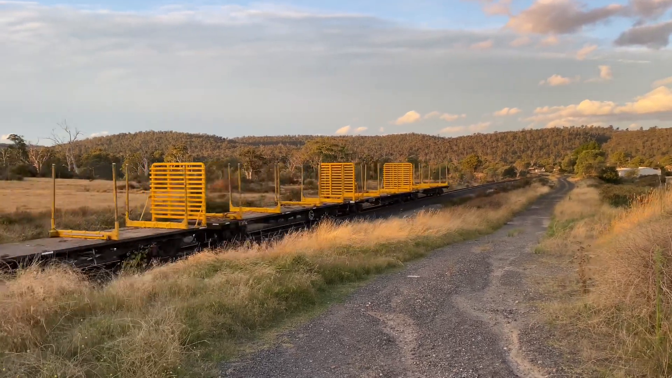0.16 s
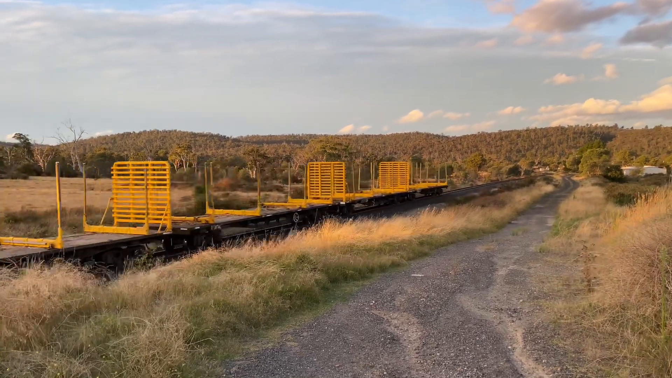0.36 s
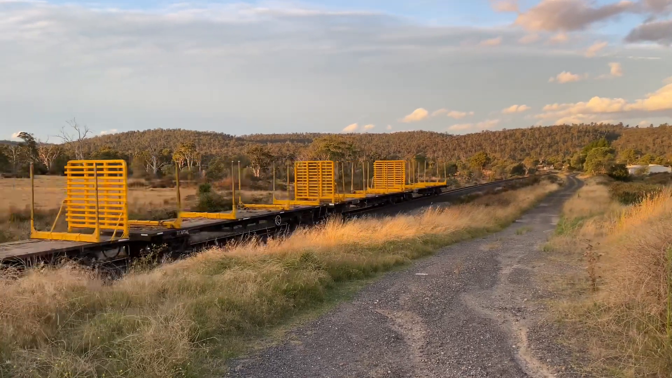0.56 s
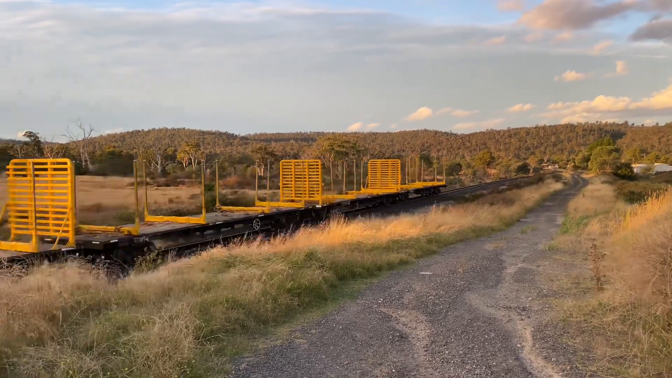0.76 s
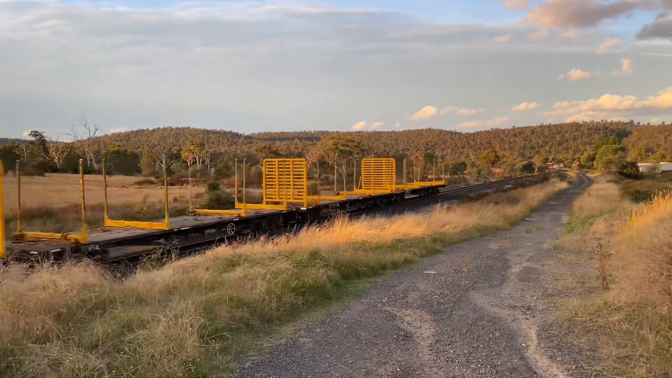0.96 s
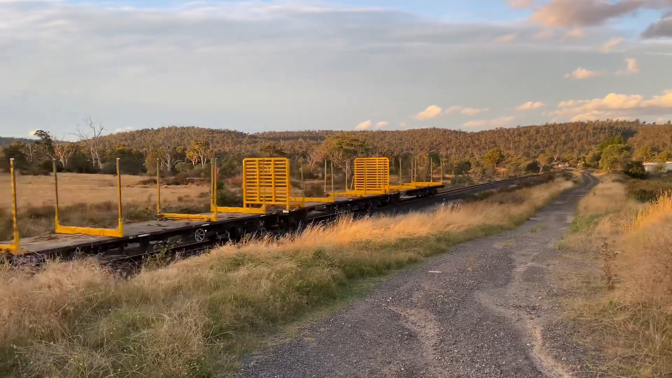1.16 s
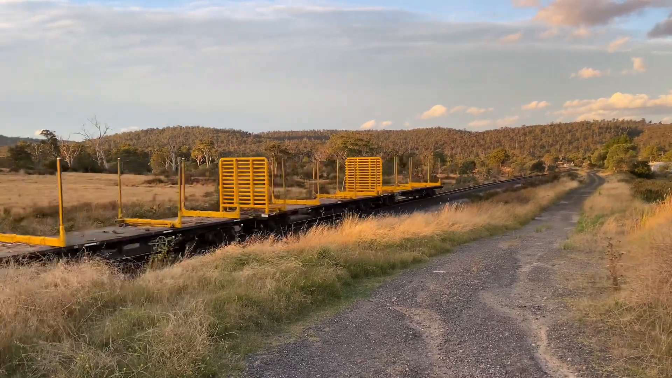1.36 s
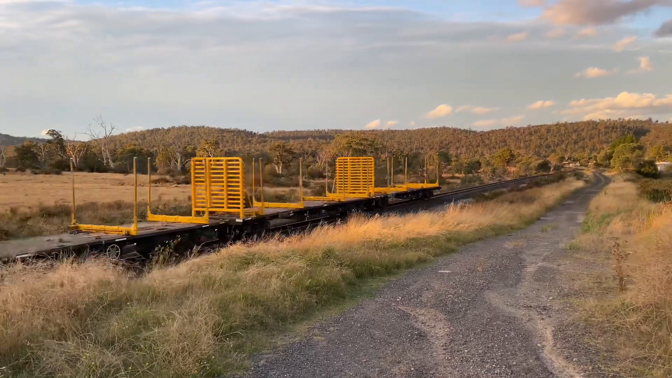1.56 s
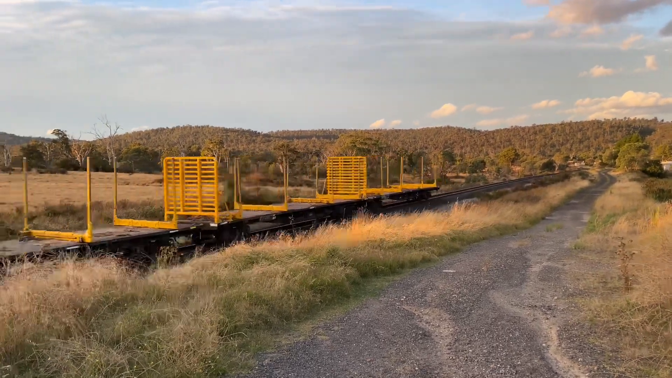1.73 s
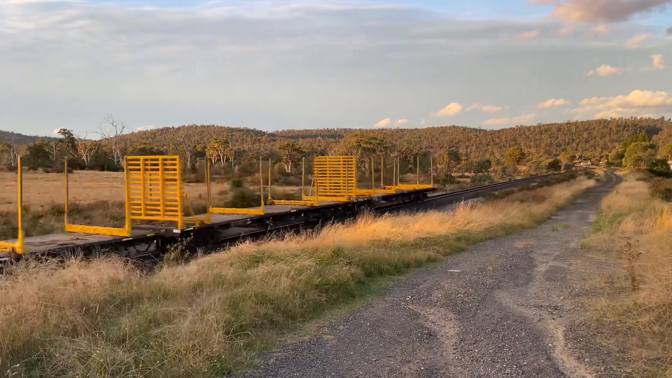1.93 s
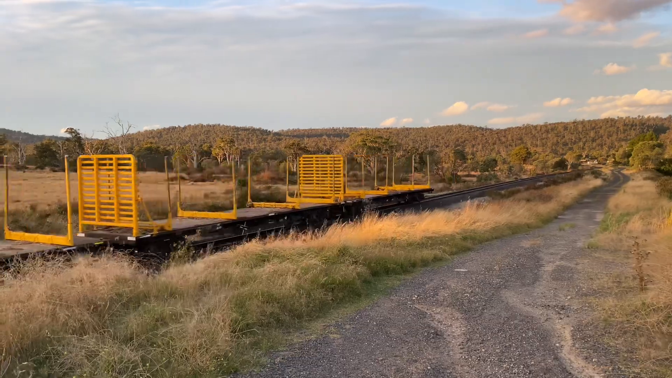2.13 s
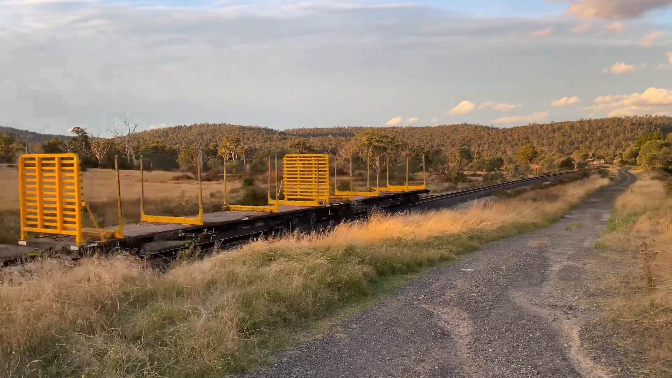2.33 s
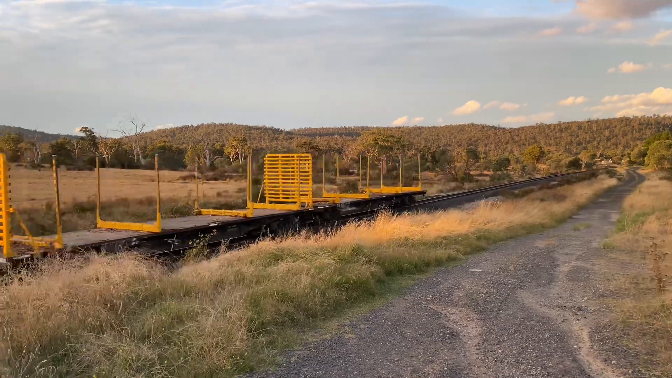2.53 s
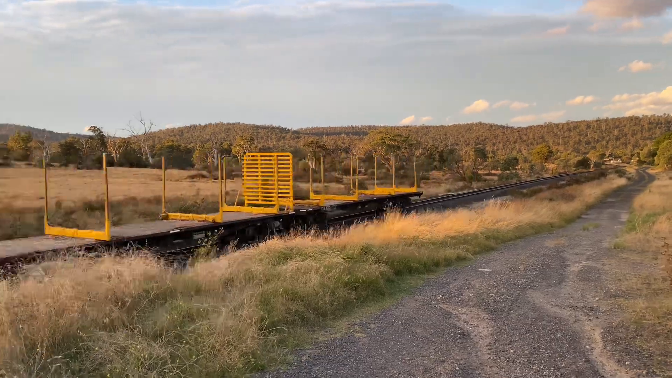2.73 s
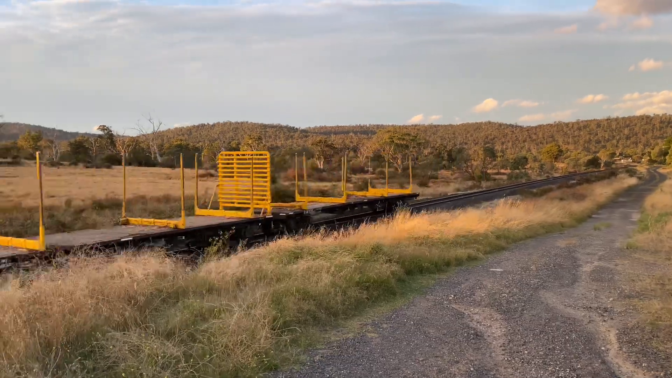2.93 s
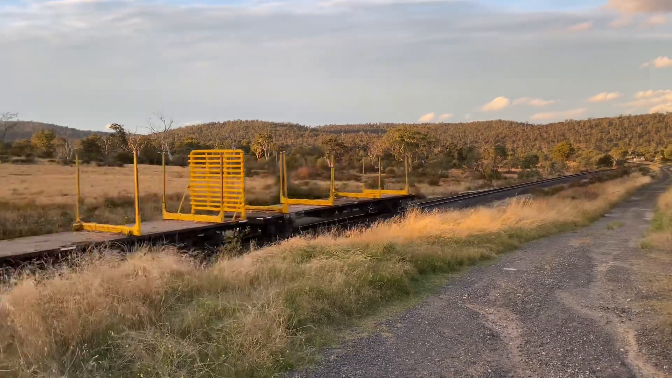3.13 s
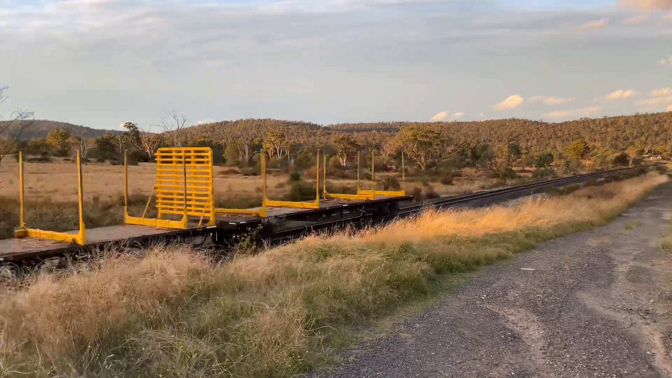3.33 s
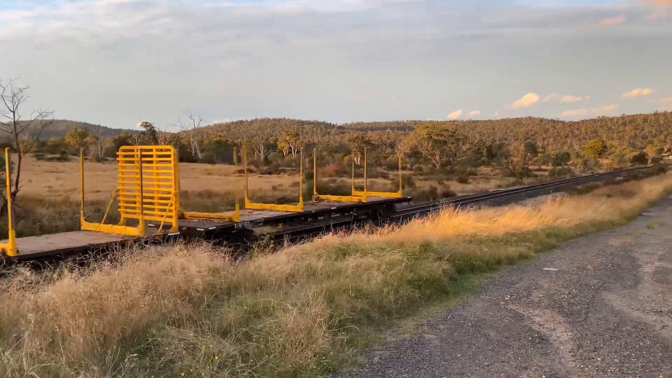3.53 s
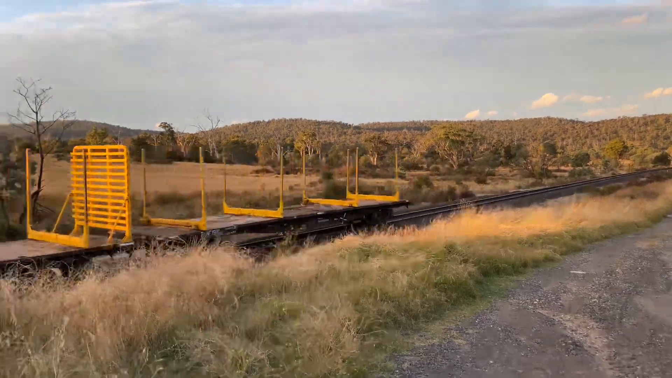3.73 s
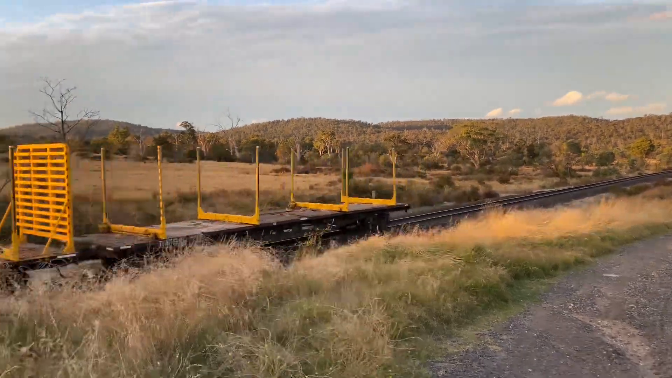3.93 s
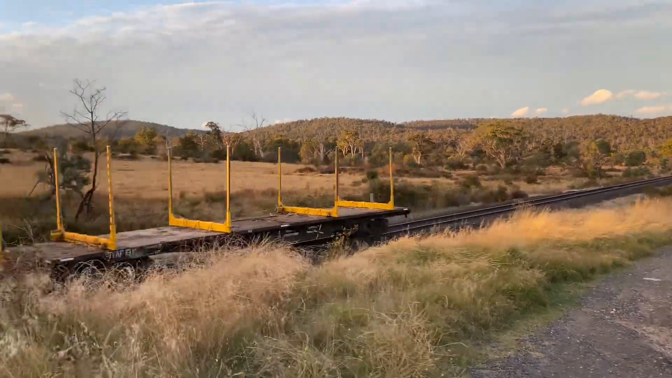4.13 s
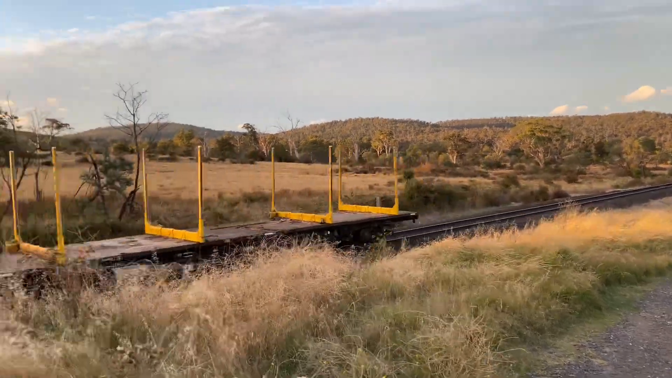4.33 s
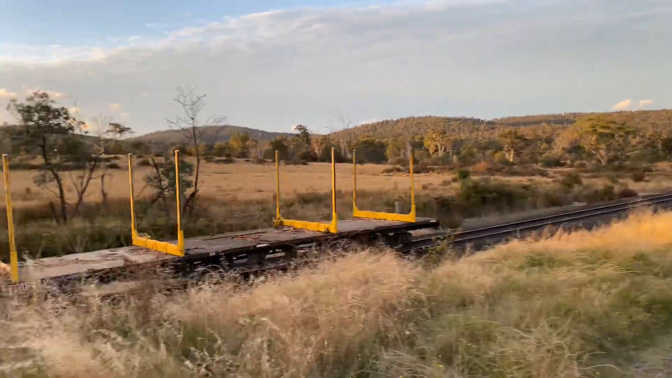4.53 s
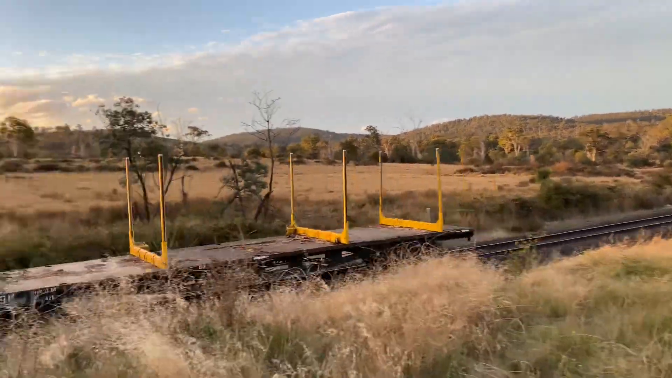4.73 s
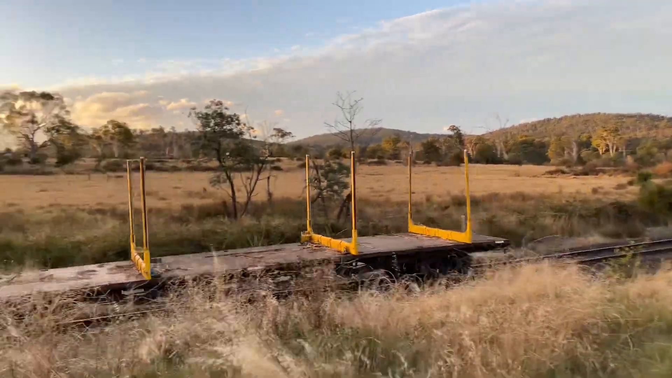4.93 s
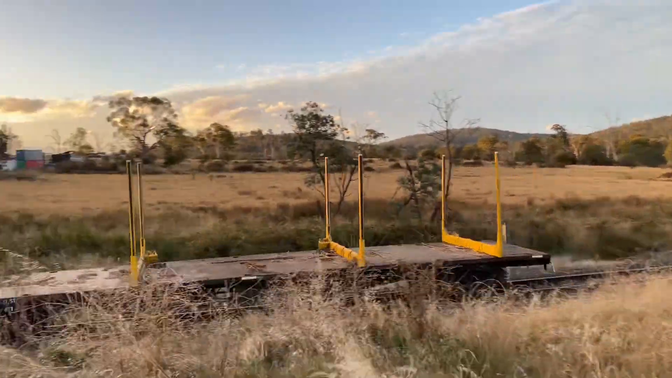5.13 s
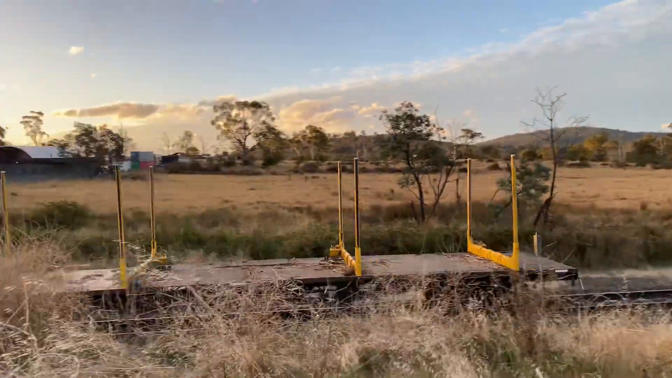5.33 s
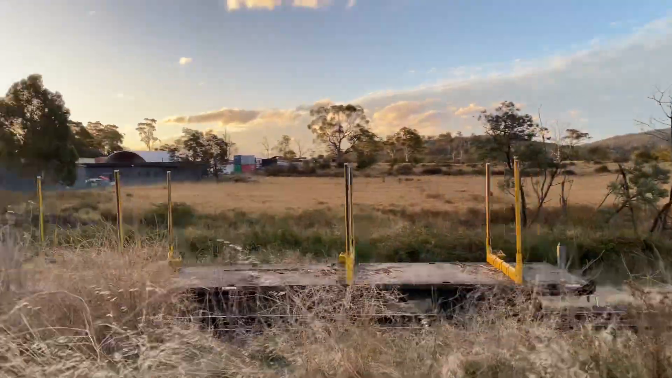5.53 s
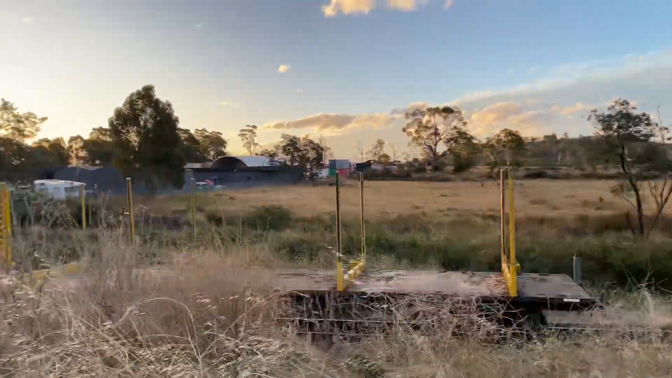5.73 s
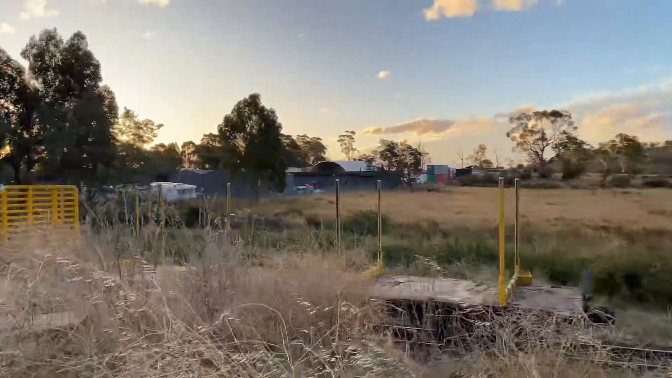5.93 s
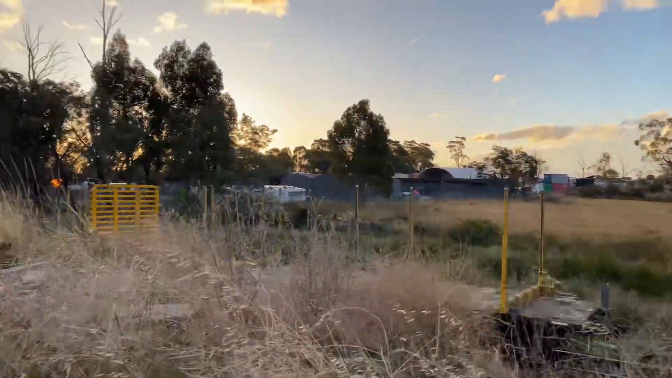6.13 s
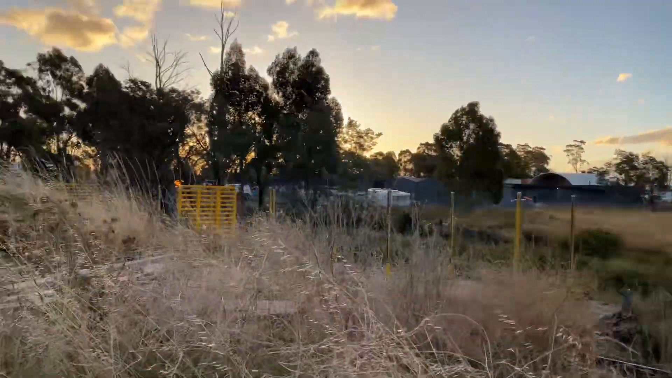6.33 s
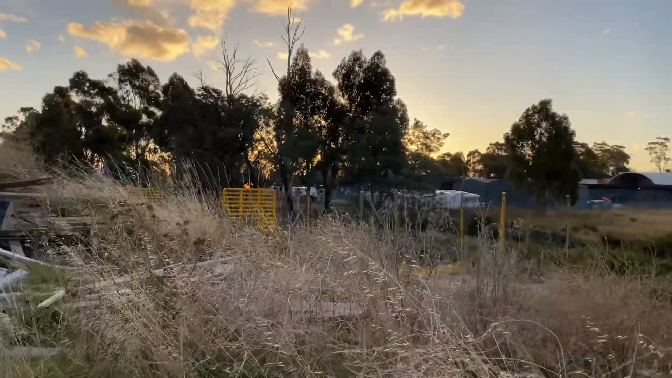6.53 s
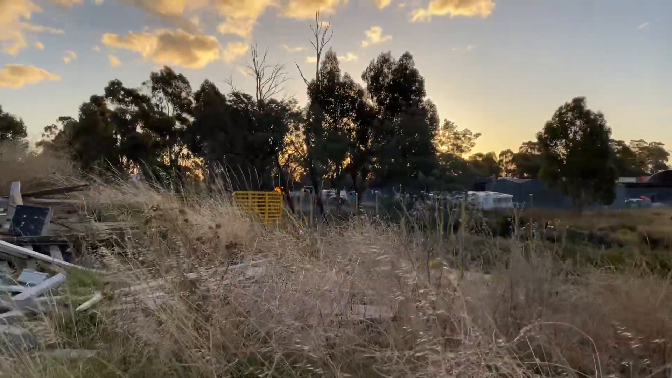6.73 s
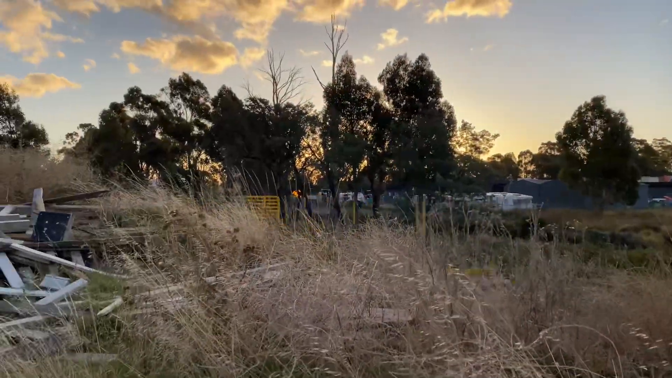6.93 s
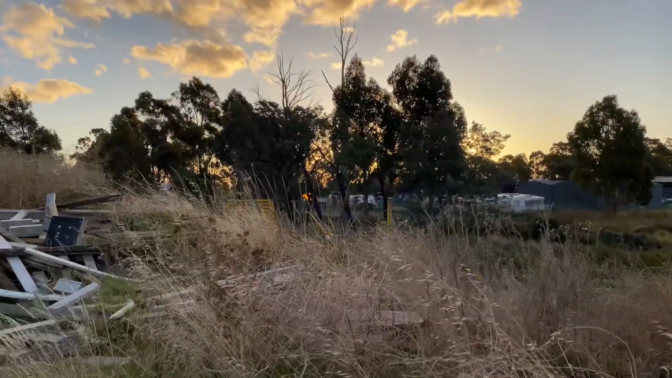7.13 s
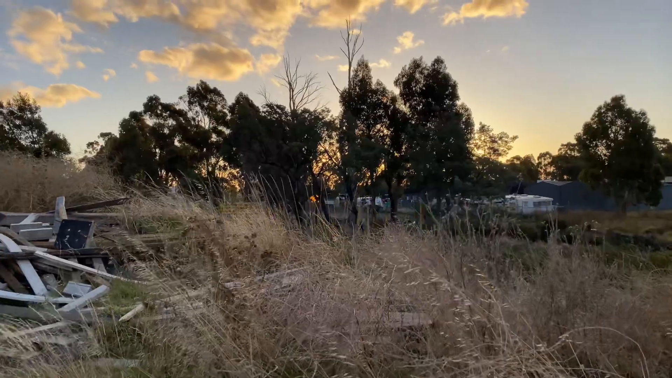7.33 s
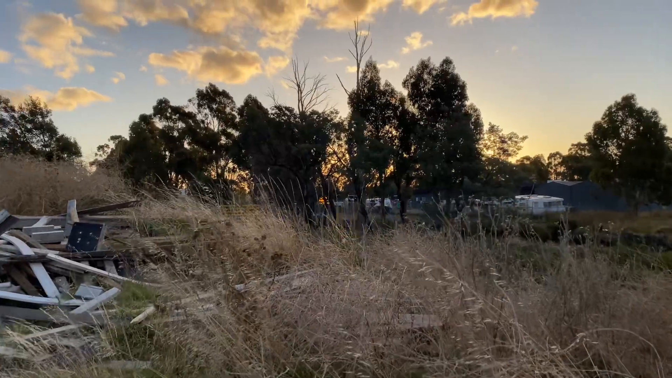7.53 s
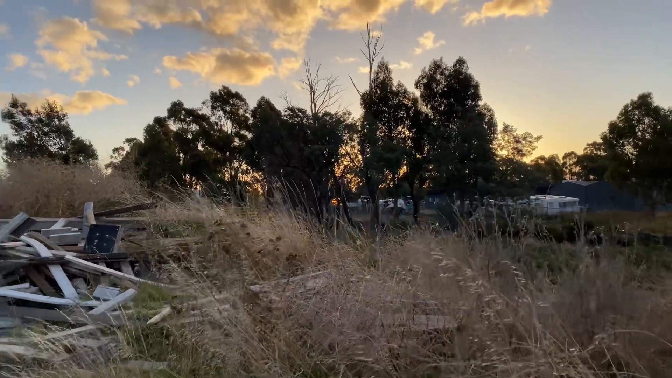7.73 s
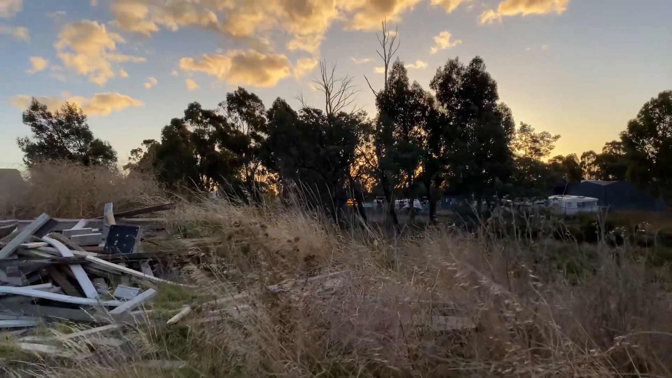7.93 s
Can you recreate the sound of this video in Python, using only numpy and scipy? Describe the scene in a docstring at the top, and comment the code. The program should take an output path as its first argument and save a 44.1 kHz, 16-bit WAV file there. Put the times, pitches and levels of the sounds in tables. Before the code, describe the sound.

Empty freight wagons roll past with rumbling, clacking wheels and rattling steel, ending in a thin squeal as wind buffets the microphone.

```python
"""Empty flat wagons on open grassland

Taken near the track on a handheld phone that turns to follow the train. Wind buffets the two
microphone ports. Wheels roar on the rail, stakes and chains rattle, axles clack in pairs over
a joint and loose steel rings now and then. A flange squeals as the last wagon draws away."""
import sys
import numpy as np
from scipy import signal
from scipy.fft import rfft, irfft, next_fast_len
from scipy.io import wavfile
from scipy.ndimage import uniform_filter1d, map_coordinates

SR = 44100
rng = np.random.default_rng(int(sys.argv[2]) if len(sys.argv) > 2 else 0)


def transcribe(u):
    """Save the signal u as a 16-bit wav file named by the first command-line argument.

    u: samples, shape (n,) or (channels, n), limited to [-1, 1]; the rate is SR.
    q: integer samples, one column per channel.
    """
    v = np.clip(np.atleast_2d(u).T, -1, 1)
    q = np.round(v * 32767).astype(np.int16)
    wavfile.write(sys.argv[1], SR, q)


N = 356766
T = np.arange(N) / SR

# Levels in the tables are relative: each source adds its own trim.
# Wind right on the microphone. Each row: time in seconds, deep rumble in dB, flutter above it in dB.
WIND_LEVELS = [(0, -23.5, -5), (.27, -17.5, 1.5), (.5, -17, -4.5), (.57, -22.5, 0), (1.3, -20, -2),
               (1.7, -31, 8.5), (1.9, -15.5, -7.5), (2.06, -27.5, -4), (2.25, -18.5, -5.5), (2.9, -22, 3.5),
               (3.45, -23.5, 0), (3.6, -30, 2), (3.93, -36, 1), (4.06, -39, 2), (4.15, -30, 8.5),
               (4.35, -40, 15), (4.8, -32.5, 7.5), (5.05, -30.5, 5), (5.25, -19, -6.5), (5.6, -26.5, 0),
               (5.75, -24, 2.5), (6, -24.5, -5.5), (6.26, -22.5, -0.5), (6.36, -6, -14), (6.42, -18, -7),
               (6.55, -26.5, -0.5), (6.8, -23.5, -2), (6.95, -33, 0), (7.3, -26.5, -8.5),
               (7.72, -33.5, 2.5), (7.8, -38, -5.5), (8.09, -36, 10.5)]
# Single eddies on the ports. Each row: start in seconds, level in dB, centre in Hz, hold in seconds.
BUFFETS = [(.105, -15.5, 198, 0.014), (.175, -15, 160, 0.033), (.243, -9.5, 87.5, 0.05),
           (0.394, -13, 96.6, 0.042), (0.499, -17, 155, 0.024), (0.812, -17, 125, 0.024),
           (.915, -16, 166, 0.0083), (0.992, -18, 76, 0.064), (1.227, -16.5, 85.4, 0.067),
           (1.394, -13.5, 110, 0.013), (1.446, -11.5, 157, 0.032), (1.495, -9, 167.5, 0.016),
           (1.643, -14.5, 175, 0.017), (1.858, -12, 96.7, 0.065), (1.983, -4, 96, 0.013),
           (2.21, -11, 77, 0.023), (2.383, -17, 157, 0.023), (2.48, -16, 138, 0.017),
           (2.595, -14, 179, 0.014), (2.825, -11, 110.6, 0.035), (2.907, -13.5, 224, 0.022),
           (2.956, -13, 113, 0.025), (3.056, -14.5, 222, 0.033), (3.086, -7, 233, 0.02),
           (3.108, -9, 330, 0.017), (3.116, -10, 496, 0.0073), (3.132, -3.5, 393, 0.0054),
           (3.152, -7, 290, 0.0069), (3.711, -20, 238, 0.031), (3.971, -17.5, 174, 0.021),
           (4.025, -18, 181, 0.027), (4.175, -19, 168, 0.026), (4.277, -11.5, 146, 0.025),
           (4.318, -16, 188, 0.024), (4.359, -16, 170, 0.04), (4.435, -12.5, 159, 0.017),
           (4.575, -17.5, 190, 0.014), (4.93, -18, 147, 0.029), (5.118, -13.5, 128, 0.034),
           (5.203, -13, 122, 0.048), (5.357, -12.5, 168.3, 0.025), (5.415, -15.5, 186, 0.022),
           (5.454, -10.5, 119, 0.017), (5.548, -12.5, 142, 0.014), (5.646, -13, 166, 0.041),
           (5.743, -18, 138, 0.017), (5.779, -13, 170, 0.026), (5.885, -16.5, 138.4, 0.054),
           (6.043, -10, 103, 0.015), (6.205, -12.5, 96, 0.009), (6.264, -17.5, 231, 0.013),
           (6.289, -12, 109, 0.013), (6.317, -6, 134, 0.015), (6.342, -10, 275, 0.0087),
           (6.353, -9, 100, 0.0093), (6.37, -17.5, 426, 0.013), (6.376, -9, 198, 0.019),
           (6.497, -8.5, 325, 0.0046), (6.628, -22, 160, 0.012), (6.651, -8.5, 190, 0.011),
           (6.668, -11, 130, 0.022), (6.755, -9.5, 320, 0.0062), (6.774, -13.5, 174, 0.017),
           (6.855, -14, 149, 0.0071), (6.988, -18, 210, 0.0099), (7.067, -12.5, 134, 0.012),
           (7.212, -15, 108, 0.011), (7.309, -12.5, 84.5, 0.017), (7.443, -23, 255, 0.023),
           (7.585, -16.5, 158, 0.0091), (7.695, -18.5, 182, 0.014), (7.966, -18, 224, 0.0082)]
# The rolling train, heard from the trackside. Each row: time in seconds, rail roar in dB,
# wagon body above it in dB, brightness in dB.
ROLL_LEVELS = [(0.0, -32.5, 1.5, 1.5), (0.74, -29, 0, -3), (1.08, -31.5, 0.5, 0.5), (2.5, -32, -2, -1),
               (2.77, -29.5, -2.5, -0.5), (3.56, -31.5, -3, 0.5), (4.05, -29, -5.5, -3),
               (4.3, -29.5, 2.5, 1.5), (4.64, -33.5, 2, 2.5), (4.96, -30.5, -1.5, 1), (5.72, -33, 1.5, 1.5),
               (6.04, -34, 1, 2), (6.65, -32.5, 0, -1), (7.7, -41.5, 2.5, -8.5), (8.09, -39, 1.5, 0.5)]
# Where the wheels lie as the phone turns. Each row: time in seconds, lead of the left port in ms
# for the nearest wheels, the same for the further wheels.
BEARINGS = [(0, 0.43, 0.06), (3.6, 0.44, 0.068), (4.3, 0.17, 0.43), (4.8, -0.054, 0.25),
            (5.6, 0.07, -0.065), (6.2, -0.4, 0.06), (6.9, -0.38, 0.053), (8.09, -0.58, 0.017)]
# The broad roar under the resonances. Each row: frequency in Hz, level in dB.
ROAR_SPECTRUM = [(250, -3.5), (500, -6), (1150, -10.5), (1400, -17.5), (2400, -20), (2900, -25),
                 (4000, -28), (5000, -28), (7000, -33), (8200, -39.5), (10800, -37.5), (12300, -54),
                 (14000, -54), (15700, -48)]
# Wheel and rail resonances. Each row: centre in Hz, width in Hz, level in dB, share of the swell.
RESONANCES = [(694, 134, -14, 0), (973, 240, -10.5, 0.96), (1076, 87, -12.5, 1), (1256, 130, -14, 0),
              (1744, 39, -15, 0.42), (2115, 120, -13, 1), (2300, 56, -14, 0.64), (2524, 85, -16, 0.37),
              (2686, 61, -14, 0.58), (2953, 93, -18.5, 0.58), (3230, 125, -12, 0.97),
              (3500, 87, -9.5, 0.35), (3855, 400, -9.5, 0.06), (4223, 120, -8.5, 0.31), (4376, 34, -9, 0),
              (5270, 88, -12.5, 0.1), (5690, 80, -13, 0.69)]
# Swell of the resonances. Each row: time in seconds, swell in dB for those under 1.4 or over 4 kHz,
# swell in dB for those between.
SWELL = [(0, 8.5, 10.5), (.7, 1.5, 3), (1.2, 4, 9), (2.9, 7, 7), (3.4, -7, 4), (4.3, -7, 4), (4.8, 1, 7.5),
         (5.2, -16, 6), (5.65, -5, 6.5), (5.75, -10, 13.5), (6.02, -8, 14.5), (6.12, -9, 8), (6.4, -27, -8),
         (6.8, 0, 5), (8.09, -7, -35)]
# Two-axle bogies over the joint. Each row: start in seconds, first axle in dB, second axle in dB,
# extra lows in dB, extra top in dB.
BOGIES = [(-.054, -43, -31.5, 2, 2), (.352, -28, -27, -5, -1), (1.287, -26, -26, -4, -1),
          (1.695, -26, -25.5, -4.5, -3), (2.646, -24.5, -26, -6, -2), (3.055, -24, -26.5, -10, -3),
          (4.018, -26, -25, -1.5, 2), (4.426, -27, -28.5, -5.5, 2), (5.408, -26, -22, -8, 0),
          (5.636, -29.5, -25, -1, 1), (6.625, -31.5, -29, 2.5, 3.5)]
# The leading axle, sharp and short, then the trailing one, duller and longer.
# Each row: lows in dB, top in dB, seconds to fade 60 dB, thud in dB.
AXLE_TONES = [(7.5, -9.5, 0.1, -2), (2.5, -11, 0.21, 8)]
# Couplings and frames knocking. Each row: start in seconds, level in dB, lows in dB, top in dB,
# seconds to fade 60 dB.
KNOCKS = [(.641, -34, 4, -9, 0.25), (2.453, -34, 2, -25, 0.19), (3.446, -27.5, 5, -27, 0.16),
          (4.1205, -17.5, 4.5, -8.5, 0.31), (4.812, -15.5, -2, -12, 0.24), (5.221, -32, -6, -10, 0.13),
          (5.3598, -27.5, -14, -6, 0.39), (6.409, -33, -9, -11, 0.078), (6.497, -50, 9, -20, .06),
          (6.525, -47, 16, -20, 0.091), (7.087, -42.5, 15.5, -33, 0.13), (7.433, -36, 9, -12, 1),
          (7.946, -51, 17, 1, 0.16)]
# Loose steel on the wagons. Each row: start in seconds, pitch in Hz, level in dB, hold in seconds,
# seconds to fade 60 dB, roughness as noise over tone, lead of the left port in ms.
STEEL_RINGS = [(.34, 2000, -41, .04, .1, 1.5, 0), (.61, 1030, -33, .04, .1, .7, .17),
               (.63, 1140, -30, .05, .12, .5, .12), (.77, 1570, -36, .05, .1, .8, .05),
               (.785, 1105, -34, .03, .08, .6, .08), (.79, 4600, -50, .06, .12, 2, .43),
               (1.07, 811, -33, .035, .08, .6, .13), (1.075, 1018, -34, .035, .08, .6, .19),
               (1.19, 1640, -41, .03, .08, 1, .09), (1.45, 4950, -54, .05, .15, 1.5, .43),
               (1.45, 10780, -46, .06, .35, .3, .46), (1.57, 865, -34, .03, .1, .7, .19),
               (1.84, 989, -34, .04, .1, .7, .15), (2.0, 1750, -39, .05, .12, .7, .4),
               (2.6, 1684, -42, .04, .1, 1, 0), (2.63, 767, -33, .03, .08, .7, .24),
               (2.725, 995, -29, .04, .12, .6, .24), (3.09, 2547, -42, .04, .1, .7, .43),
               (4.125, 3762, -27, .045, .05, .35, .27), (4.125, 1660, -33, .03, .08, 1.2, .32),
               (4.13, 880, -24, .02, .07, .9, .19), (4.13, 1200, -27, .03, .08, 1.5, .23),
               (4.812, 640, -30, .02, .1, .9, .3), (4.812, 1770, -33, .02, .08, .8, .33),
               (4.82, 920, -30, .02, .1, .9, .29), (4.98, 10500, -52, .03, .1, .6, 0),
               (5.544, 520, -28, .008, .06, 1.5, -.1), (5.55, 1433, -41, .02, .08, .8, -.1),
               (6.625, 857, -34, .02, .07, .8, -.19), (7.43, 1730, -33, .045, .12, .2, .08),
               (7.435, 3593, -44, .03, .1, .5, .12), (7.48, 1800, -41, .06, .25, .4, .08)]
# The flange on the rail. Each row: time in seconds, first partial in dB, second partial in dB,
# left minus right in dB.
SQUEAL_LEVELS = [(5.2, -54, -64, 2), (5.35, -45, -62, 2), (5.55, -50, -60, 3), (5.75, -43, -51, 2),
                 (5.85, -42, -49, 3), (5.95, -41, -54, 2), (6.05, -35, -54, 4), (6.15, -38, -49, 5),
                 (6.25, -43, -47, 1), (6.35, -40, -60, 2), (6.45, -46, -44, 3), (6.55, -40, -53, 5),
                 (6.65, -44, -52, 4), (6.75, -52, -50, 4), (6.85, -43, -60, 0), (7.07, -40, -56, -1),
                 (7.15, -47, -59, -3), (7.25, -51, -68, -8), (7.35, -49, -62, -10), (7.45, -51, -61, -6),
                 (7.65, -59, -68, -10), (7.75, -52, -66, -9), (8.09, -57, -72, -9)]
# The squeal sinks as the wagon draws away. Each row: time in seconds, pitch in Hz.
SQUEAL_PITCH = [(5.2, 3818), (5.65, 3783), (6.05, 3746), (6.55, 3702), (6.85, 3684), (7.35, 3664),
                (8.09, 3653)]
# Where the squeal comes from. Each row: time in seconds, lead of the left port in ms.
SQUEAL_BEARING = [(5.2, -.08), (6.4, -.11), (7, -.04), (7.35, .03), (7.5, .12)]
# The right port hears a little less treble. Each row: frequency in Hz, gain in dB.
RIGHT_PORT = [(2500, 0), (4200, -2.5), (6500, -0.5)]

GUSTS_PER_S, GUST_DB = 11, 2.5
BUFFET_FADE_CYCLES, BUFFET_ROUGHNESS, SLAP_DB = 7.3, 0.69, -5
RING_DB, HISS_DB, RING_BRIGHTNESS_SHARE = -5.5, -11, 0.17  # wheel ring and hiss against the roar
FURTHER_DB, SCATTER_GAIN, GRASS_CUTOFF_HZ = 1, 0.8, 6800  # grass dulls what the ground scatters
RATTLES_PER_S, RATTLE_DB, RATTLE_SPREAD_DB, RATTLE_T60_S = 30, -14.5, 5.5, 0.1
AXLE_GAP_S, KNOCK_THUD_DB = .135, -2
PAN = np.array([[.5], [-.5]])  # splits a left-minus-right difference between the ports


def undb(db):
    """Decibels to amplitude."""
    return 10 ** (np.asarray(db) / 20)


def unit(x):
    """Scales to an RMS of one."""
    return x / np.sqrt(np.mean(x ** 2))


def curves(table):
    """Columns joined by straight lines in time."""
    times, *columns = np.transpose(table)
    return [np.interp(T, times, column) for column in columns]


def band(x, lo_hz, hi_hz, order=2):
    """Butterworth band-pass."""
    sos = signal.butter(order, [lo_hz, min(hi_hz, .45 * SR)], "band", fs=SR, output="sos")
    return signal.sosfilt(sos, x)


def noise(lo_hz, hi_hz, size=N, order=2):
    """A band of noise at an RMS of one."""
    return unit(band(rng.standard_normal(size + 4096), lo_hz, hi_hz, order)[4096:])


def walk(per_s):
    """Random levels held 1 / per_s seconds and smoothed twice; spread near 1."""
    hold = int(SR / per_s)
    steps = np.repeat(rng.standard_normal(N // hold + 1), hold)
    return 1.32 * uniform_filter1d(uniform_filter1d(steps, hold), hold)[:N]


def add(out, start_s, x):
    """Mixes x in at a start time."""
    i = max(int(start_s * SR), 0)
    out[..., i:i + x.shape[-1]] += x[..., :N - i]


def burst(hold_s, t60_s, rise_s):
    """Quick rise, a hold, then an exponential fade; half a second in all."""
    t = np.arange(int(.5 * SR)) / SR
    fade_db = -60 * np.maximum(t - max(hold_s, 0), 0) / max(t60_s, .01)
    return (1 - np.exp(-t / rise_s)) * undb(fade_db)


def colour(x, table):
    """Shapes a spectrum by (Hz, dB) points."""
    hz, db = np.transpose(table)
    size = next_fast_len(x.shape[-1])
    bins_hz = np.maximum(np.arange(size // 2 + 1) * SR / size, 1)
    gain = undb(np.interp(np.log(bins_hz), np.log(hz), db))
    return irfft(rfft(x, size) * gain, size)[..., :x.shape[-1]]


def wander(x, drift=.025):
    """Lets the pitch drift by running a sound slightly faster and slower."""
    return np.interp(np.cumsum(1 + drift * walk(2.5)), np.arange(N), x, period=N)


def ports(x, further=False, waver_ms=.02):
    """A source reaches the two ports at different times; a long source wavers in direction."""
    lead_ms = curves(BEARINGS)[int(further)] + waver_ms * walk(25)
    positions = np.arange(N) + PAN * lead_ms * SR / 1000
    return np.array([map_coordinates(x, [p], order=3, mode="mirror") for p in positions])


def wind():
    """Eddies press on both ports, partly alike; each band gusts and flutters in level."""
    deep_db, flutter_db = curves(WIND_LEVELS)
    out = np.zeros((2, N))
    for lo_hz, hi_hz, db, alike in ((49.6, 94, deep_db, .68), (101, 204, deep_db + flutter_db, .73)):
        mid, side = noise(lo_hz, hi_hz), noise(lo_hz * 1.18, hi_hz * 1.13)
        pair = np.sqrt(1 + alike) * mid + np.sqrt(1 - alike) * np.array([side, -side])
        out += pair * undb(db - 2 + GUST_DB * walk(GUSTS_PER_S) + 2.4 * walk(22))
    return out


def wheels(levels_db):
    """One group of wheels: roar in flickering bands, and resonances that flare as rough patches pass."""
    edges_hz = [600, 1400, 3000]  # between body, roar, ring and hiss
    parts, judder = np.zeros((4, N)), walk(16)
    for hz in 280 * 2 ** (np.arange(18) / 3):
        flicker_db = (2.8 if hz < edges_hz[1] else 1.2) * walk(19)
        gain = np.sqrt(hz) * undb(0.98 * judder + flicker_db)
        parts[np.searchsorted(edges_hz, hz)] += gain * noise(hz / 1.17, hz * 1.129)
    parts = [unit(part) for part in colour(parts, ROAR_SPECTRUM)]
    outer_db, inner_db = curves(SWELL)
    for hz, width_hz, db, share in RESONANCES:
        swell_db = share * (inner_db if 1400 < hz < 4000 else outer_db)
        gain = undb(db + swell_db + 2.3 * walk(9))
        resonance = wander(noise(hz - width_hz / 2, hz + width_hz / 2))
        parts[np.searchsorted(edges_hz, hz)] += gain * resonance
    return sum(undb(db) * part for db, part in zip(levels_db, parts))


def rolling():
    """Near and further wheels come from their own directions; the ground scatters some to each port."""
    roar_db, body_db, bright_db = curves(ROLL_LEVELS)
    ring_db = RING_DB + RING_BRIGHTNESS_SHARE * bright_db
    levels_db = roar_db - 4.5 + np.array([body_db, np.zeros(N), ring_db, HISS_DB + bright_db])
    near, further = wheels(levels_db), undb(FURTHER_DB) * wheels(levels_db)
    dulled = band(near + further, 91, GRASS_CUTOFF_HZ, order=1)
    # scattered paths change length as the wagons move
    paths = [np.arange(N) - SR * (lag_s + .002 * walk(3)) for lag_s in (.02, .037)]
    scattered = np.array([map_coordinates(dulled, [p], order=1, mode="nearest") for p in paths])
    return ports(near) + ports(further, further=True) + SCATTER_GAIN * scattered


def rattle():
    """Stakes and chains shake: many faint short rings whose level follows the rail roar."""
    out, roar_db = np.zeros(N), curves(ROLL_LEVELS)[0]
    for when, pitch, size, length in rng.random((250, 4))[:int(RATTLES_PER_S * N / SR)]:
        hz = 700 * 4 ** pitch
        shape = burst(0.034 * length, RATTLE_T60_S, rise_s=0.0022)[:SR // 6]
        size_db = -RATTLE_SPREAD_DB * np.log(1 - .9 * size)
        db = roar_db[int(when * N)] + RATTLE_DB + size_db - 8.5 * pitch
        ring = noise(hz * .975, hz * 1.025, len(shape), order=1)
        add(out, when * N / SR, undb(db) * shape * ring)
    return ports(out)


def clacks():
    """Axles drop over the joint and frames knock: a thud and a crack that set the resonances ringing."""
    hits = []
    for first_s, *axle_dbs, extra_low_db, extra_top_db in BOGIES:
        for axle, (low_db, top_db, t60_s, thud_db) in enumerate(AXLE_TONES):
            start_s = first_s + axle * AXLE_GAP_S
            if start_s > 0:
                hits.append((start_s, axle_dbs[axle], low_db + extra_low_db, top_db + extra_top_db,
                             t60_s, thud_db + extra_low_db))
    for start_s, db, low_db, top_db, t60_s in KNOCKS:
        hits.append((start_s, db, low_db, top_db, t60_s, KNOCK_THUD_DB + low_db))
    direct, diffuse = np.zeros(N), np.zeros((2, N))
    crack_bands_hz = (600, 2300), (2400, 6820), (8600, 11700)
    for start_s, db, low_db, top_db, t60_s, thud_db in hits:
        thud = burst(hold_s=0.0082, t60_s=0.082, rise_s=0.00096)[:SR // 8] * noise(340, 970, SR // 8)
        add(direct, start_s, undb(db - 7.5 + thud_db) * thud)
        shape = burst(hold_s=0.011, t60_s=t60_s, rise_s=0.0015)
        for path in (direct, *diffuse):  # each port also gets a crack of its own
            low, mid, top = (noise(*edges, len(shape), order=3) for edges in crack_bands_hz)
            crack = undb(low_db + 2) * low + mid + undb(top_db) * top
            add(path, start_s, undb(db - 10.5) * shape * crack)
    ringing = sum(undb(db + 10) * band(direct, hz - width_hz / 2, hz + width_hz / 2, order=1)
                  for hz, width_hz, db, _ in RESONANCES)
    return ports(direct + ringing) + .4 * diffuse


def buffets():
    """An eddy strikes the microphone: a slap and a short flapping rumble."""
    out, size = np.zeros((2, N)), SR // 4
    for start_s, db, hz, hold_s in BUFFETS:
        shape = burst(hold_s, BUFFET_FADE_CYCLES / hz, rise_s=0.0044)[:size]
        turn = np.arange(size) / SR * hz * 1.68
        push_pull = np.sin(2 * np.pi * turn ** .7) * (turn < 1)  # a steep push, a slower pull back
        slap = rng.choice([-1, 1]) * band(push_pull, 60, 900)
        both, left, right = (noise(hz / 2.83, hz * 1.81, size, order=3) for _ in range(3))
        flap_hz = hz * (1 + .3 * uniform_filter1d(both, 200))
        flap = np.sin(2 * np.pi * (rng.random() + np.cumsum(flap_hz) / SR))
        roughness = BUFFET_ROUGHNESS * min(hz, 240) / 150  # quick eddies are rougher
        rumble = shape * (flap + roughness * (0.52 * both + 0.69 * np.array([left, right])))
        pan_db = rng.standard_normal()
        add(out, start_s, undb(db + PAN * pan_db) * (rumble + undb(SLAP_DB) * slap))
    return out


def loose_steel():
    """Loose parts ring roughly for a moment, each from its own direction."""
    out = np.zeros((2, N))
    for start_s, hz, db, hold_s, t60_s, roughness, lead_ms in STEEL_RINGS:
        shape = burst(hold_s, t60_s, rise_s=0.00055)
        tone = np.sqrt(2) * np.sin(2 * np.pi * hz * T[:len(shape)])
        ring = undb(db) * shape * (tone + roughness * noise(hz * .97, hz * 1.03, len(shape)))
        add(out[0], start_s, ring)
        add(out[1], start_s + lead_ms / 1000, ring)
    return out


def flange_squeal(rise_s=0.082):
    """A flange rubs the rail as the last wagon leaves: a thin tone with three overtones."""
    hz = curves(SQUEAL_PITCH)[0]
    lead_s = curves(SQUEAL_BEARING)[0] / 1000
    cycles = np.cumsum(hz * (1 + .0005 * walk(40))) / SR
    phase = 2 * np.pi * (cycles + PAN * hz * lead_s)
    first_db, second_db, pan_db = curves(SQUEAL_LEVELS)
    partials_db = first_db, second_db, first_db - 27, first_db - 30
    tone = sum(undb(db + 1.5 * walk(30)) * np.sin(k * phase) for k, db in enumerate(partials_db, 1))
    onset = np.clip((T - SQUEAL_LEVELS[0][0]) / rise_s, 0, 1)
    return onset * undb(PAN * pan_db) * tone


def scene():
    """Wind on the microphone and the wagons going by, left and right."""
    return wind() + buffets() + rolling() + clacks() + loose_steel() + rattle() + flange_squeal()


def record(dry, ceiling=.98, top_hz=15750):
    """The phone, a little duller on the right, rounds the loudest peaks and cuts the top."""
    pair = np.array([dry[0], colour(dry[1], RIGHT_PORT)])
    rounded = ceiling * np.tanh(pair / ceiling)
    return signal.sosfilt(signal.ellip(8, .2, 70, top_hz, fs=SR, output="sos"), rounded)


dry = scene()
out = record(dry)
transcribe(out)
```